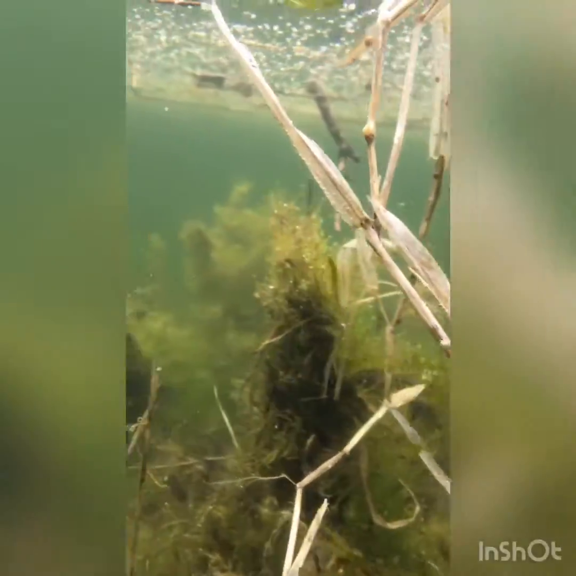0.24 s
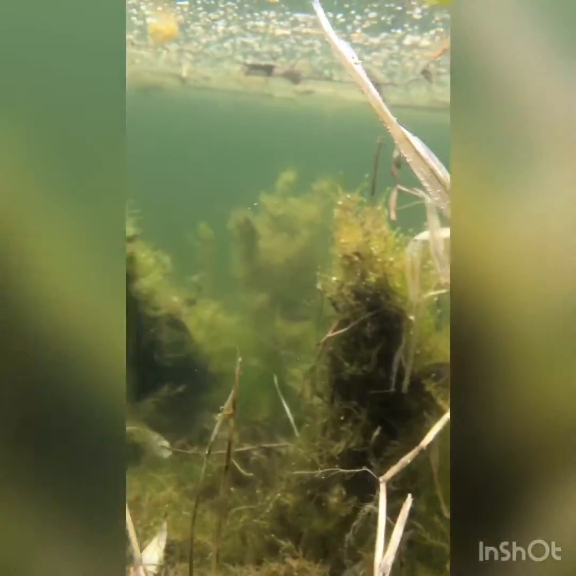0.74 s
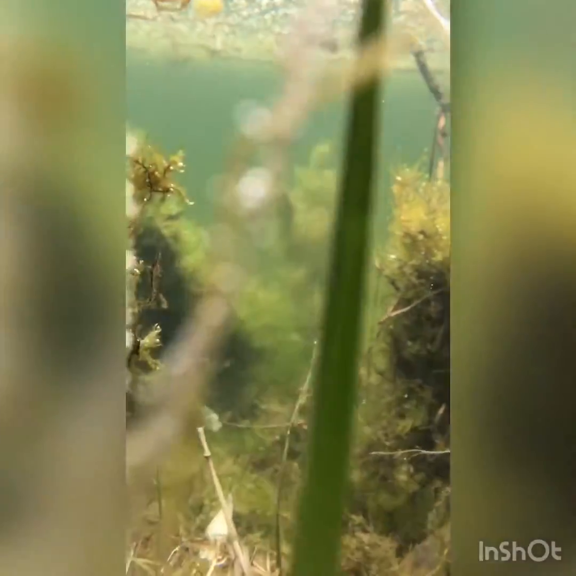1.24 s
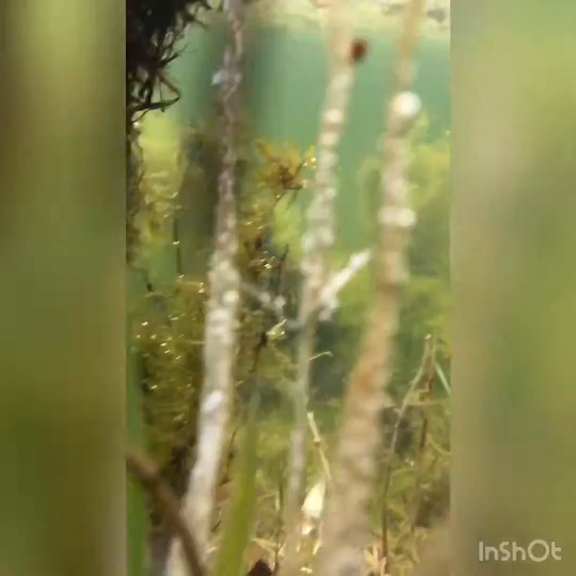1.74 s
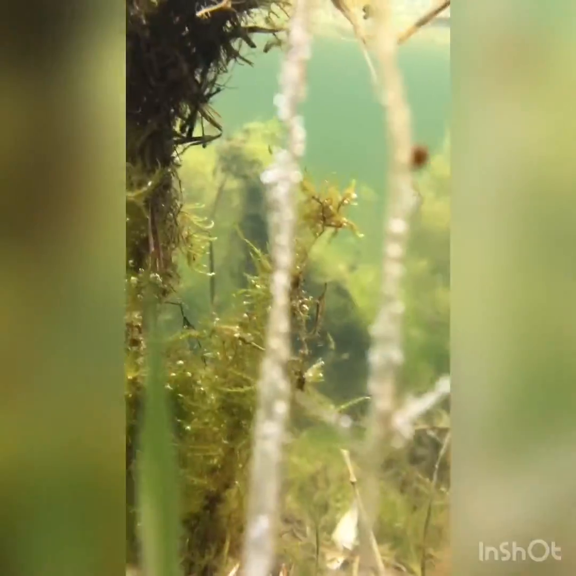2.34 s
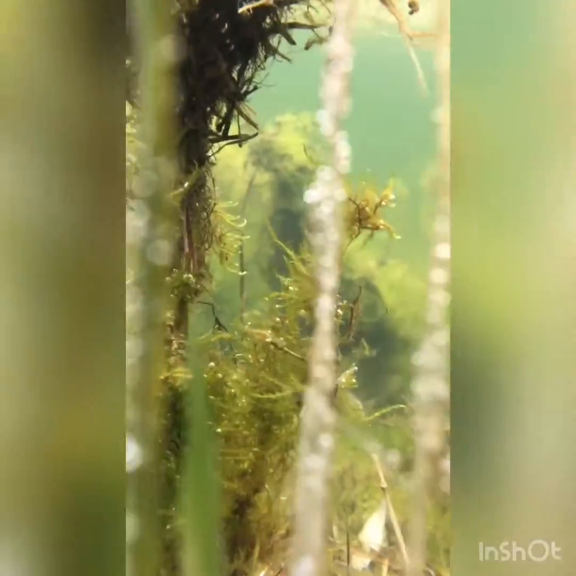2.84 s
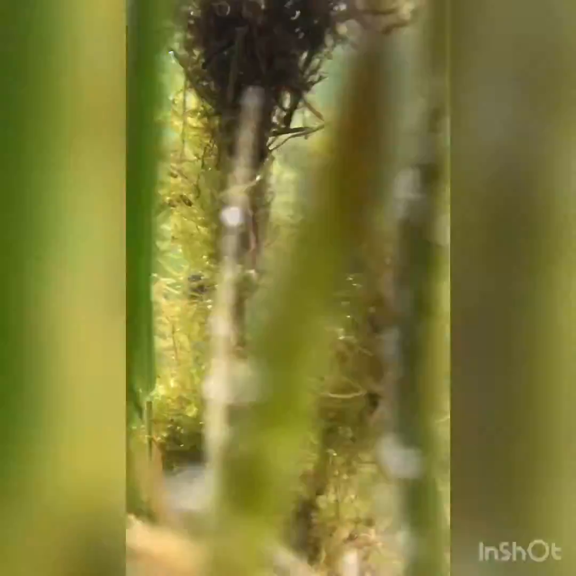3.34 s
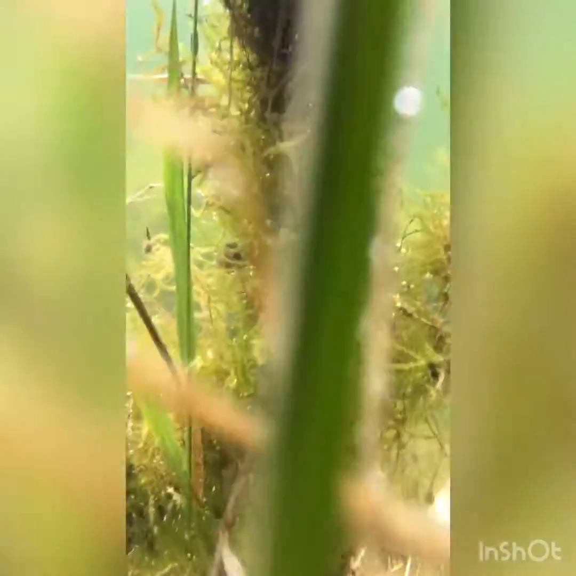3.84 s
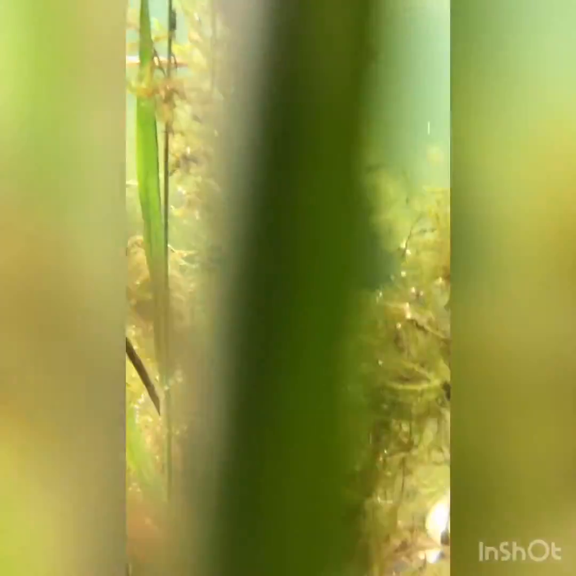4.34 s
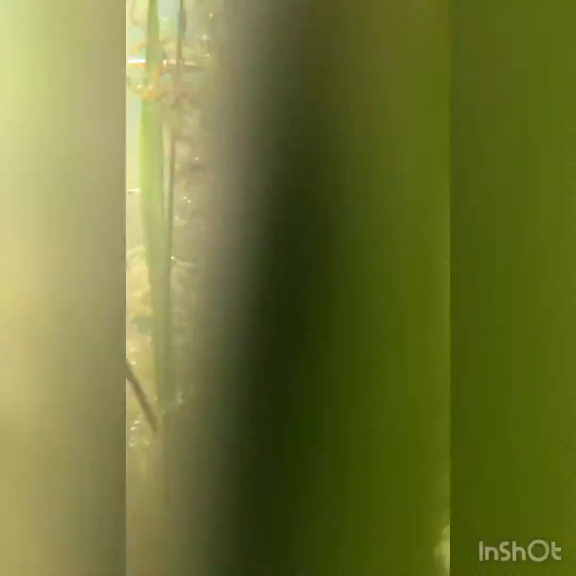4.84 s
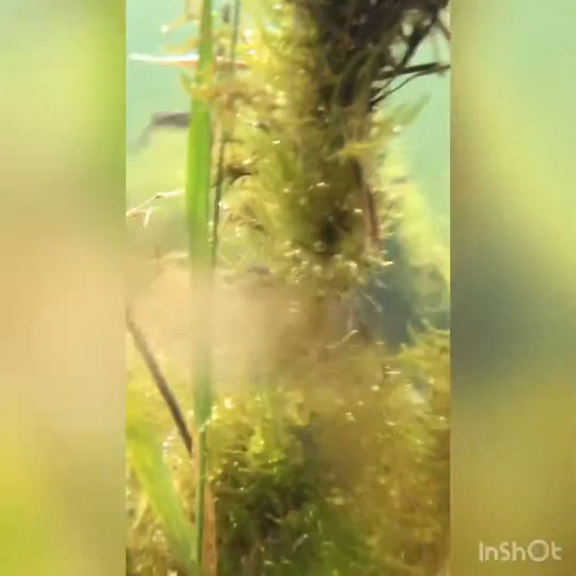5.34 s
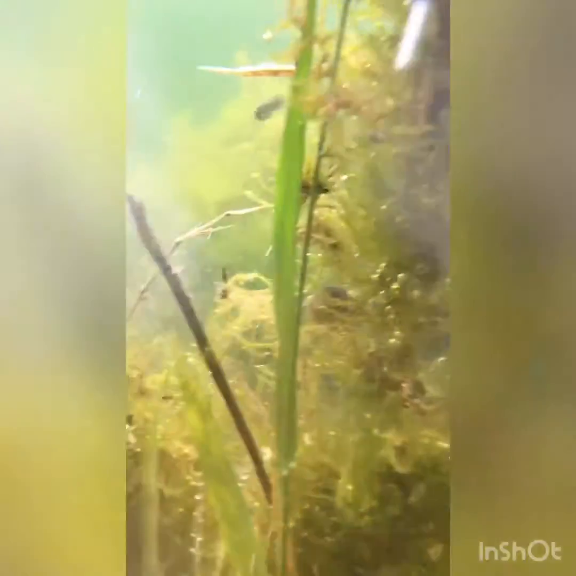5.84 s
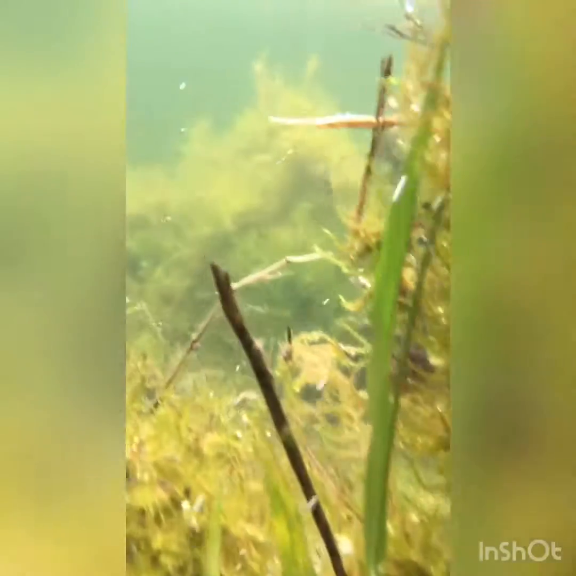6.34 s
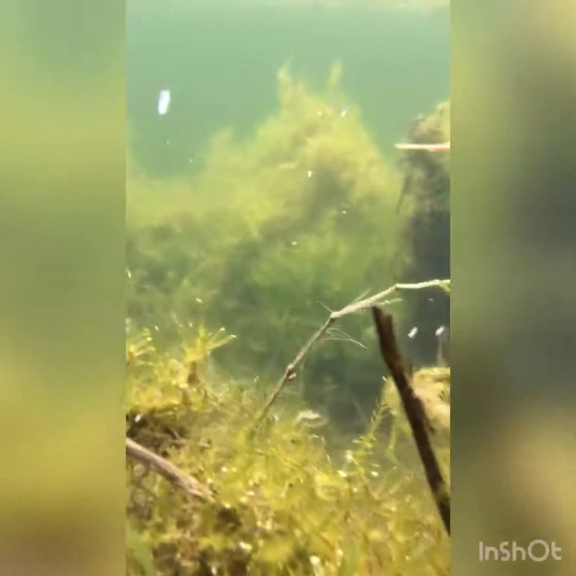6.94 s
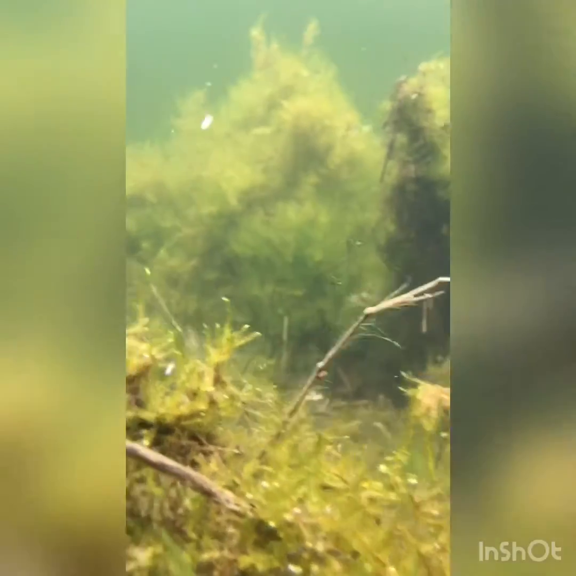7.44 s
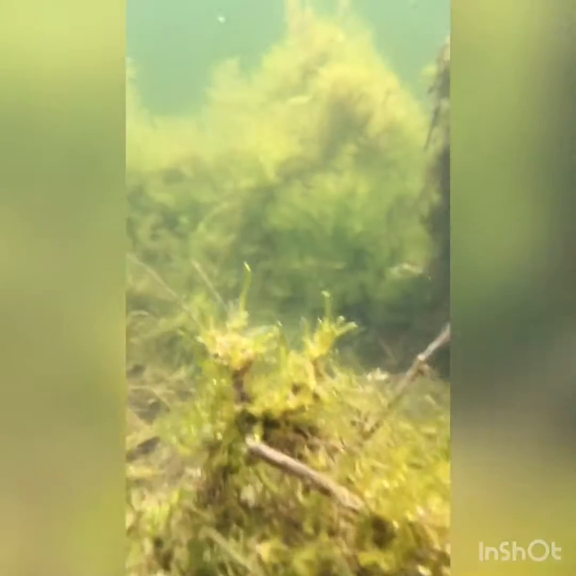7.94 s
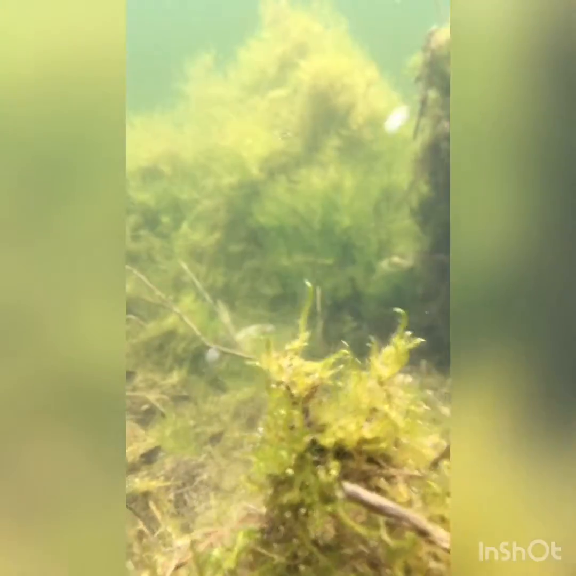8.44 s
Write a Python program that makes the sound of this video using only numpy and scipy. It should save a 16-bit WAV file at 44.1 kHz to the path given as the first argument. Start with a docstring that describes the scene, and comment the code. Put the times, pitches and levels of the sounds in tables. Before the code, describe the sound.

Heard through the case of a camera submerged in a pond, water rumbles low while weed rustles and tiny bubbles click and plop. Stems first knock irregularly on the pole, then crack against the case. Stuttering leaf scrapes build into a rough, rushing rub with a hollow ring, easing into a few light knocks and low bumps. Faint, rapid electronic ticks and hiss lie underneath.

```python
"""Under water in a pond, a small camera on a pole is pushed through weed. Water rocks the housing in a
low rumble, soft weed rustles and sheds bubbles, stems knock the pole and snap against the case, and
leaves rub along it in a dense, rushing stick-slip crackle that rings the case. The electronics tick
twenty times a second over a faint hiss and whine."""
import sys
import numpy as np
from scipy import signal
from scipy.fft import rfft, irfft, next_fast_len
from scipy.io import wavfile
from scipy.ndimage import uniform_filter1d

SR = 44100
rng = np.random.default_rng(int(sys.argv[2]) if len(sys.argv) > 2 else 0)


def inscribe(sig):
    """Save sig as 16-bit PCM at rate SR to the path in sys.argv[1].

    A 1-D sig is mono; a 2-D sig holds one channel per row.
    Samples are clipped to [-1, 1] before scaling.
    """
    pcm = np.round(np.clip(np.atleast_2d(sig).T, -1, 1) * 32767)
    wavfile.write(sys.argv[1], SR, pcm.astype(np.int16))


N = 382788
T = np.arange(N) / SR
CONTROL_T = T[::44]  # about 1 ms steps


def undb(db):
    """Decibels to amplitude."""
    return 10 ** (np.asarray(db) / 20)


def level(x, rms_db):
    """Scales x to an rms level."""
    return x * undb(rms_db) / np.sqrt(np.mean(x ** 2))


def shape(table, hz):
    """Gain of (Hz, dB) points joined on a log axis."""
    points_hz, db = np.transpose(table)
    return undb(np.interp(np.log(hz + 1), np.log(points_hz), db, left=-90, right=-90))


def colour(x, table, lo_hz=1, hi_hz=20000):
    """Colours x and keeps one soft-edged band."""
    size = next_fast_len(N)
    hz = np.arange(size // 2 + 1) * SR / size + 1e-3
    band = hz ** 2 / (hz ** 2 + lo_hz ** 2) * hi_hz ** 2 / (hz ** 2 + hi_hz ** 2)
    return irfft(rfft(x, size) * shape(table, hz) * band, size)[:N]


def ring(x, modes, passes=2):
    """Parallel resonances (Hz, width Hz, dB per pass), applied repeatedly."""
    for _ in range(passes):
        x = sum(undb(db) * signal.lfilter(*signal.iirpeak(hz, hz / width_hz, fs=SR), x)
                for hz, width_hz, db in modes)
    return x


def roam(x, hz, width_hz):
    """A steep resonance whose centre moves sample by sample."""
    turn = np.exp(2j * np.pi * np.cumsum(hz) / SR)
    pole = np.exp(-np.pi * width_hz / SR)
    return np.real(turn * signal.lfilter([(1 - pole) ** 2], np.poly([pole, pole]), x / turn))


def walk(rate_hz):
    """Random steps, smoothed twice; spread near 1."""
    hold = int(SR / rate_hz)
    steps = np.repeat(rng.standard_normal(N // hold + 1), hold)
    return 1.492 * uniform_filter1d(uniform_filter1d(steps, hold), hold)[:N]


def grit(per_s, spread_db):
    """Random clicks, a few much larger than the rest, none huge."""
    hit = rng.random(N) < per_s / SR
    push = np.tanh(rng.standard_normal(N))
    return hit * push * undb(spread_db * np.minimum(rng.exponential(size=N), 3.5))


def place(times_s, pulses):
    """Lays each pulse, centred, at its time."""
    out = np.zeros(N)
    for at, pulse in zip(np.round(times_s * SR).astype(int) - pulses.shape[1] // 2, pulses):
        out[max(at, 0):at + len(pulse)] += pulse[max(-at, 0):N - at]
    return out


def contact(start_s, length_s, first_db, last_db, touch_db_per_s=370, release_db_per_s=288):
    """Gain of one contact: it comes fast, slides in level and lets go, faster if it swelled."""
    slide_db = np.interp(CONTROL_T, [start_s, start_s + length_s], [first_db, last_db])
    slip_off = 1 + max(last_db - first_db, 0) / 4
    touch_db = touch_db_per_s * np.maximum(start_s - CONTROL_T, 0)
    release_db = release_db_per_s * slip_off * np.maximum(CONTROL_T - start_s - length_s, 0)
    return undb(slide_db - touch_db - release_db)


def together(gains):
    """Adds contact gains in power, at audio rate."""
    return np.interp(T, CONTROL_T, np.sqrt(np.sum(np.square(gains), axis=0)))


# Amplifier hiss spectrum. Each row: frequency in Hz, gain in dB.
HISS_SPECTRUM = [(1500, -3), (3500, -11), (5200, -19), (7900, -12.5), (13500, -14), (15800, -17)]
# Whine before it fades. Each row: frequency in Hz, rms level in dB.
WHINE_TONES = [(6850, -84)]
# Tick resonances. Each row: frequency in Hz, width in Hz, gain per pass in dB.
TICK_RESONANCES = [(3070, 770, 5.5), (4140, 670, 3.5), (7880, 4800, 1)]


def electronics(first_tick_s=.0282, period_s=.050004, jitter_s=.0003, whine_fade_s=3.95):
    """A regular tick of varying colour, a thin whine that fades to a fifth, and amplifier hiss."""
    times_s = np.arange(first_tick_s, N / SR, period_s)
    scatter = rng.standard_normal((len(times_s), 1 + len(TICK_RESONANCES))).T
    at = np.clip(((times_s + jitter_s * scatter[0]) * SR).astype(int), 0, N - 1)
    impulses = np.zeros((len(TICK_RESONANCES), N))
    impulses[:, at] = undb(-32 + 2 * scatter[1:])
    ticks = sum(ring(x, [mode]) for x, mode in zip(impulses, TICK_RESONANCES))
    whine = sum(np.sqrt(2) * undb(db) * np.sin(2 * np.pi * hz * T) for hz, db in WHINE_TONES)
    fade = np.clip(10 * (whine_fade_s - T), .2, 1)
    hiss = level(colour(rng.standard_normal(N), HISS_SPECTRUM), -69.5)
    return ticks + whine * fade + hiss


# Patches of fizz. Each row: start in seconds, length in seconds, level in dB.
FIZZ_PATCHES = [(1.526, 0.04, -67), (1.69, 0.064, -71), (7.903, 0.18, -67.5)]


def fizz():
    """A soft, patchy treble fizz that comes and goes."""
    treble = ring(grit(9000, 1.5), [(7800, 8500, 0)]) * undb(3.7 * walk(35))
    gains = [contact(start_s, length_s, db, db) for start_s, length_s, db in FIZZ_PATCHES]
    return level(treble, 0) * together(gains)


def bubbles():
    """Gas bubbles leave the weed: tiny ones click, the rarer large ones plop."""
    plop_hz = 520 * np.exp(0.28 * walk(12))
    clicks = ring(grit(40, 2.5), [(2270, 1540, 6.8)])
    plops = roam(grit(22, 2.7), plop_hz, width_hz=220)
    return undb(-37) * clicks + undb(-8) * plops


# Soft weed spectrum. Each row: frequency in Hz, gain in dB.
WEED_SPECTRUM = [(100, -29.5), (275, -9), (600, -14.5), (1000, -17.5), (2000, -29), (3500, -44),
                 (6000, -65)]
# Tufts brushing past. Each row: start in seconds, length in seconds, first and last gain in dB.
TUFTS = [(0.404, 0.12, -47.5, -32), (0.595, 0.13, -39.5, -35), (0.795, 0.025, -35, -37.5),
         (1.22, 0.043, -35, -32), (1.694, 0.03, -29.5, -52), (7.853, 0.018, -37, -62),
         (3.841, 0.022, -34, -35)]


def weed_rustle(steady_gain_db=-48.5):
    """Soft weed gives patches of dull grains that ring hollow in the case; brushing tufts gurgle."""
    grains = grit(2500, 2.55) * undb(6.7 * np.tanh(walk(55)))
    rustle = level(colour(grains, WEED_SPECTRUM), -0.41)
    hollow = level(ring(grains, [(960, 86, 0)]), -30)
    gurgle = level(ring(grit(400, 1.9), [(470, 255, 0)]), -4.5)
    brushing = together([contact(*row) for row in TUFTS])
    return undb(steady_gain_db) * (rustle + hollow) + brushing * (undb(-10.5) * rustle + gurgle)


# Rocking of the housing. Each row: time in seconds, gain in dB.
SWAY_GAINS = [(0.0, -37.5), (0.25, -27.5), (1.47, -26.5), (1.7, -22.5), (1.95, -27), (4.15, -27),
              (4.57, -35), (4.75, -31), (5.8, -24.5), (7.04, -25.5), (7.12, -28.5), (7.35, -25),
              (8.68, -25)]
# Housing modes. Each row: frequency in Hz, width in Hz, gain per pass in dB.
HOUSING_MODES = [(64.1, 22, 4), (101, 59, -9)]


def housing_sway(rock_hz=41):
    """The housing rocks on its pole at a wandering pitch; turbulence shakes its higher modes."""
    times_s, gain_db = np.transpose(SWAY_GAINS)
    hz = rock_hz * np.exp(0.25 * np.tanh(walk(22)))
    rock = (1 + 0.49 * walk(22)) * np.sin(2 * np.pi * np.cumsum(hz) / SR)
    turbulence = rng.standard_normal(N) * undb(1.34 * walk(12))
    shake = ring(turbulence, HOUSING_MODES)
    return (level(rock, -2) + level(shake, -6.5)) * undb(np.interp(T, times_s, gain_db))


# Lurches. Each row: start in seconds, envelope peak in dB, pitch in Hz.
HOUSING_LURCHES = [(4.479, -18, 43.7), (4.754, -14.5, 78), (4.864, -21, 139), (5.004, -12, 44),
                   (7.236, -16, 57.6), (7.637, -16.5, 72.5), (8.241, -16.5, 54), (8.524, -16, 66)]


def housing_lurches(rise_cycles=0.38):
    """The housing lurches against the water: a low swing that swells and dies in a few cycles."""
    start_s, peak_db, hz = np.transpose(HOUSING_LURCHES)[:, :, None]
    cycles = np.maximum(np.arange(8192) - 4096, 0) / SR * hz
    envelope = cycles / rise_cycles * np.exp(1 - cycles / rise_cycles)
    return place(start_s[:, 0], -undb(peak_db) * envelope * np.sin(2 * np.pi * cycles))


# Stem snaps. Each row: time in seconds, low crack peak in dB, treble against it in dB, decay in ms.
STEM_SNAPS = [(0.079, -25.5, -27, 1.9), (1.323, -22, -28, 1.5), (3.361, -30, -5, 0.47),
              (3.888, -21, -11, 1.8), (3.895, -20.5, -9, 1), (3.923, -13.5, -42, 4.8),
              (3.937, -18, -32, 1.4), (3.966, -20, -11.5, 1.9), (4.022, -19, -29, 0.8),
              (4.26, -18, -8.5, 2.2), (4.457, -14, -8, 1.17), (4.610, -13.5, -38, 0.15),
              (4.752, -18, -13.5, 2.6), (4.934, -25, -13, 2.1), (4.987, -13, -29, 0.67),
              (5.259, -41, 12.5, 0.81), (5.664, -37, 15.5, 0.6), (5.676, -7.5, -4.5, 2),
              (5.683, -9, -3.5, 2), (6.19, -26, 10, 0.57), (6.479, -28.5, 0, 0.14), (6.659, -23, -5.5, 2.5),
              (7.165, -38, 10.5, 0.83), (7.287, -13, -6.5, 0.038), (7.634, -29, -8, 0.71),
              (8.499, -30, -4.5, 0.18)]


def stem_snaps(thud_hz=75, thud_decay_s=0.0046):
    """A stem cracks against two regions of the case, then displaced water thuds."""
    times_s, peak_db, treble_db, decay_ms = np.transpose(STEM_SNAPS)[:, :, None]
    t = (np.arange(4096) - 2048) / SR
    attack = np.clip(t * 3000 / decay_ms, 0, 1)
    decay = np.exp(-np.abs(t) * 1000 / np.clip(decay_ms, .05, 8))
    crack = rng.standard_normal(decay.shape) * attack * decay
    wall = ring(crack, [(1054, 1580, 0)], passes=3)
    lens = ring(crack, [(3740, 3330, 0)], passes=3)
    wall, lens = (x / np.abs(x).max(axis=1, keepdims=True) for x in (wall, lens))
    thud = (t >= 0) * np.sin(2 * np.pi * thud_hz * t) * np.exp(-np.abs(t) / thud_decay_s)
    return place(times_s[:, 0], undb(peak_db) * (wall + undb(-4) * thud + undb(treble_db) * lens))


# Stems striking the pole. Each row: time in seconds, peak of the blow in dB.
POLE_KNOCKS = [(0.79, -24.5), (1.105, -20.5), (1.214, -21), (1.348, -23.5), (1.514, -11.5), (1.59, -13.5),
               (1.669, -13), (1.796, -16), (1.995, -17), (2.093, -14), (2.206, -24.5), (2.282, -16.5),
               (2.383, -19), (2.488, -23), (2.569, -18), (2.684, -26.5), (2.785, -24), (2.968, -23),
               (7.646, -29), (7.741, -24), (7.822, -26), (7.987, -23), (8.53, -26.5)]
# Knock spectrum. Each row: frequency in Hz, gain in dB.
KNOCK_SPECTRUM = [(30, 11.5), (50, 8), (250, -4), (330, -18), (430, 2.5), (600, 2), (800, -6.5),
                  (2000, -17), (3200, -44), (6000, -51)]


def pole_knocks(travel_s_at_1hz=0.0895, rattle_decay_s=0.023):
    """Bending waves run up the pole at a speed growing as the root of pitch: treble first, thud last."""
    times_s, peak_db = np.transpose(POLE_KNOCKS)[:, :, None]
    count, size = len(times_s), 8192
    hz = np.arange(size // 2 + 1) * SR / size
    t = (np.arange(size) - size // 2) / SR
    centring_s = size / 2 / SR - travel_s_at_1hz / np.sqrt(6000)  # 6 kHz arrives at t = 0
    lag_cycles = 2 * travel_s_at_1hz * np.sqrt(hz) + hz * centring_s + 0.063
    # harder blows are brighter; each stem differs a little
    treble_db = 0.59 * peak_db + 0.47 * rng.standard_normal((count, 1))
    tilt = undb(treble_db * hz ** 2 / (hz ** 2 + 900 ** 2))
    blows = irfft(shape(KNOCK_SPECTRUM, hz) * tilt * np.exp(-2j * np.pi * lag_cycles), size)
    blows /= np.abs(blows).max(axis=1, keepdims=True)
    # the stem rattles after the blow
    rattle = ring(rng.standard_normal((count, size)), [(525, 144, 12), (1140, 290, 3.5)])
    rattle *= undb(-21 + 6.4 * rng.standard_normal((count, 1))) / rattle.std()
    rattle *= np.clip(t / 0.00043, 0, 1) * np.exp(-np.abs(t) / rattle_decay_s)
    return place(times_s[:, 0], (blows + rattle) * undb(peak_db))


# Rubbing spectrum. Each row: frequency in Hz, gain in dB.
RUB_SPECTRUM = [(90, -11.5), (300, -7.5), (420, -1.5), (700, -4.5), (990, 1), (2330, -14), (4500, -38.5),
                (15000, -55)]
# Case modes. Each row: frequency in Hz, width in Hz, gain in dB.
CASE_MODES = [(429, 87, 13.5), (607, 165, 11), (1044, 150, 1), (1563, 510, 1), (2400, 320, -27)]
# Leaf strokes. Each row: start in seconds, length in seconds, first and last drag in dB,
# then hard edges and soft bumps in dB against the drag.
LEAF_STROKES = [(3.456, 0.13, -47.5, -41.5, -11, -4), (3.94, 0.17, -41, -47.5, -4, 11),
                (4.165, 0.17, -45.5, -35, -11.5, 4), (4.362, 0.11, -49, -35.5, -10, 7.5),
                (4.504, 0.12, -42.5, -51, -9, 5), (4.641, 0.23, -39.5, -38, -10, 7),
                (4.945, 0.027, -29.5, -38, -8.5, 11), (5, 0.032, -27.5, -29.5, -13, 3),
                (5.111, 0.12, -26.5, -39.5, -14, 3), (5.288, 0.14, -26, -37.5, -9.5, 4),
                (5.443, 0.19, -21.5, -30.5, -12.5, -1.5), (5.675, 0.097, -24, -37, -7, 3),
                (5.823, 0.335, -26.5, -24, -10, -2), (6.173, 0.17, -20, -25, -9, -7),
                (6.449, 0.32, -27.5, -25.5, -6, -7.5), (6.78, 0.24, -28.5, -36, -13, -5.5),
                (7.045, 0.05, -33, -22, -13, -17.5), (7.15, 0.19, -49, -44, -9, -0.5),
                (8.595, 0.15, -32, -28, -15.5, -9.5)]


def leaf_rub(edge_swell_db_per_s=17.5):
    """Leaves stick and slip along the case and ring it; hard edges add treble, soft bumps add bass."""
    drags = np.array([contact(*row[:4]) for row in LEAF_STROKES])
    drag = together(drags)
    start_s, length_s, first_db, last_db, edge_db, bump_db = np.transpose(LEAF_STROKES)[:, :, None]
    # short strokes stutter, long ones glide
    jerkiness = together(drags * np.exp(-length_s / 0.46)) / (drag + 1e-9)
    stutter = undb(5.9 * jerkiness * np.tanh(walk(90)))
    # the contact point wanders, so each mode swells and shifts pitch by itself
    ringing = sum(undb(db + 3.6 * walk(30)) * roam(grit(3200, 5.2), hz * np.exp(0.065 * walk(6)), width)
                  for hz, width, db in CASE_MODES)
    slips = colour(grit(9000, 1), RUB_SPECTRUM, lo_hz=300, hi_hz=2780)
    body = level(slips, -3.5) + level(ringing, -1) * undb(-4 * jerkiness)
    # edges rasp higher under pressure; fine hairs hiss most in light contact
    pressure = np.clip(drag / undb(-28.5), .05, 1.5)
    rasp_hz = 3500 * pressure ** 0.069 * np.exp(0.31 * np.tanh(walk(11)))
    rasp = roam(roam(grit(9000, 2.8), rasp_hz, 4500), rasp_hz, 4200)
    hairs = undb(3.4 * walk(7)) * pressure ** -0.35 * roam(grit(9000, 1), np.full(N, 8600), 4500)
    crackle = level(grit(3500, 6.7), -0.67) + level(rasp, 0.41) + level(hairs, 4.3)
    edges = level(colour(crackle, RUB_SPECTRUM, lo_hz=2340), 0)
    bumps = level(colour(grit(600, 1), RUB_SPECTRUM, hi_hz=225), 0)
    # edges bite deeper mid-stroke and as the drag grows
    elapsed_s = np.clip(CONTROL_T - start_s, 0, length_s)
    taper_db = edge_swell_db_per_s * np.abs(2 * elapsed_s - length_s)
    bite_db = 0.2 * (last_db - first_db) * elapsed_s / length_s
    scrape = drag * body + together(drags * undb(edge_db + bite_db - taper_db)) * edges
    return stutter * scrape + together(drags * undb(bump_db)) * bumps


def scene():
    """Everything reaches the one microphone through the case."""
    rumble = housing_sway() + housing_lurches()
    weed = weed_rustle() + leaf_rub() + pole_knocks() + stem_snaps()
    return (rumble + weed + bubbles() + electronics() + fizz())[None]


def record(dry, low_cut_hz=30, top_hz=15800):
    """The camera drops the deepest bass and cuts the top."""
    low_cut = signal.butter(2, low_cut_hz, "high", fs=SR, output="sos")
    top_cut = signal.ellip(10, .2, 70, top_hz, fs=SR, output="sos")
    return signal.sosfilt(top_cut, signal.sosfilt(low_cut, dry))


dry = scene()
out = record(dry)
inscribe(out)
```